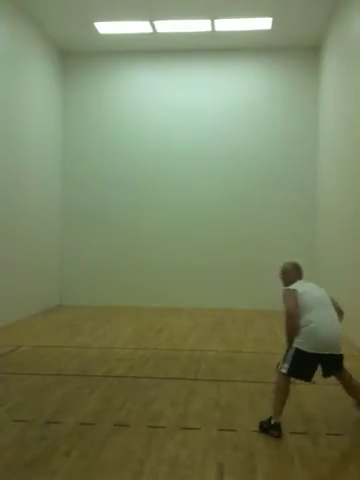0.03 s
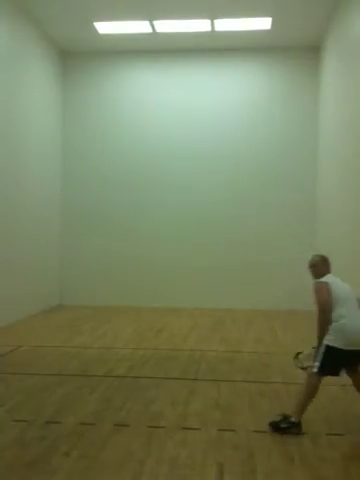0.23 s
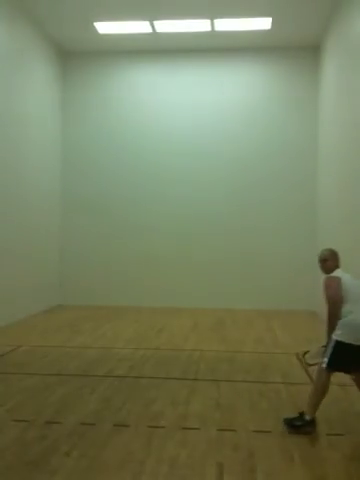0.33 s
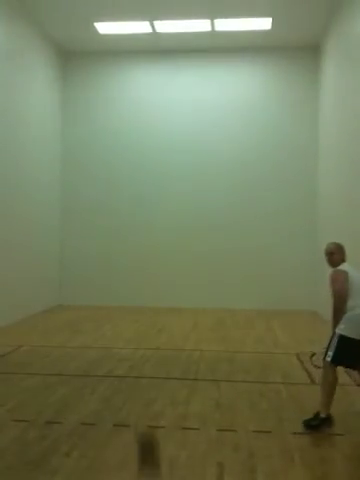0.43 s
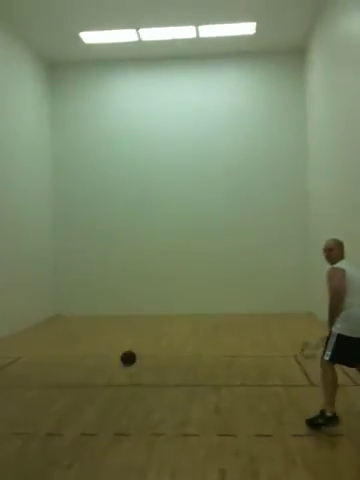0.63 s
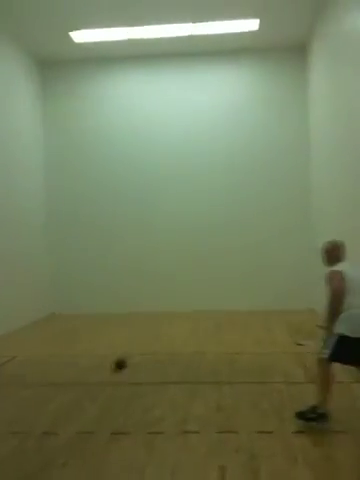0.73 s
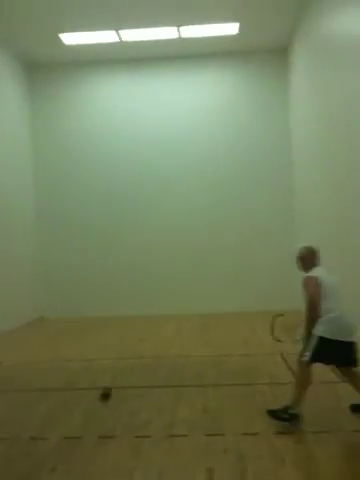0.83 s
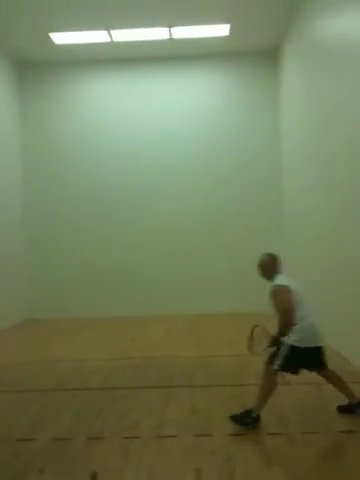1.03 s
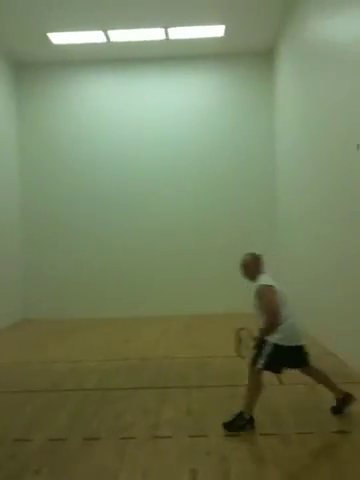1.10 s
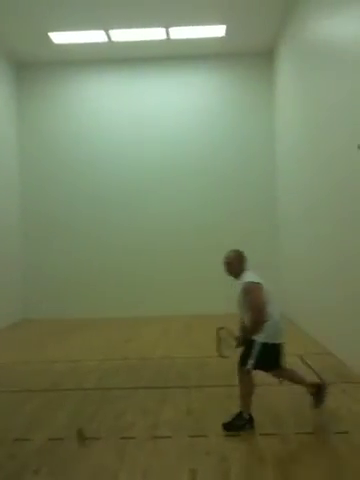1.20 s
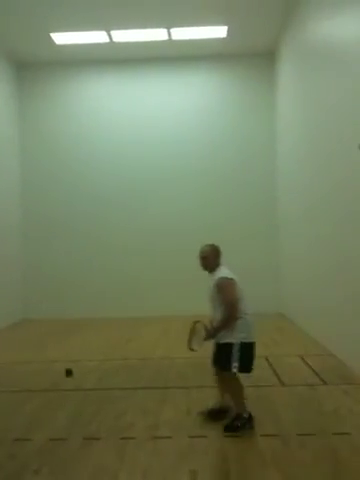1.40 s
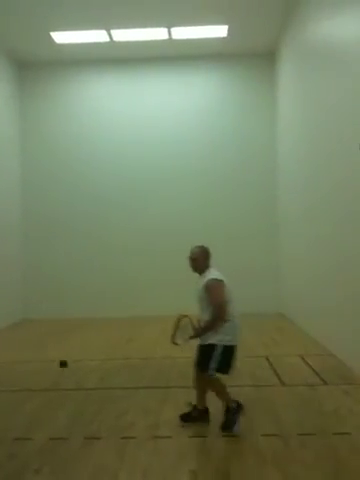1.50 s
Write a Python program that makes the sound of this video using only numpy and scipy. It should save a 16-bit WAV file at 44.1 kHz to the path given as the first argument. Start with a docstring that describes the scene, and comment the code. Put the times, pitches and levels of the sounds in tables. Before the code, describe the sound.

A racquetball skips off a wooden floor and slams into a wall close by, which booms and rattles in the echoing court. The jostled microphone rumbles, pops and briefly cuts out, then running steps thud and the ball bounces again.

```python
"""A racquetball court, close to the back wall, where an earlier shot still rings round the hall.
A hollow ball skips off the wooden floor and slams into the wall. The wall panel booms and its
loose metal fittings chatter. The jostled microphone rumbles, pops and cuts out briefly.
Dull thuds of running steps and bumps shake the camera, and the ball bounces once more."""
import sys
import numpy as np
from scipy import signal
from scipy.fft import rfft, irfft, next_fast_len
from scipy.io import wavfile
from scipy.ndimage import uniform_filter1d

SR = 44100
rng = np.random.default_rng(int(sys.argv[2]) if len(sys.argv) > 2 else 0)


def to_wav(s):
    """Save 16-bit WAV."""
    ch = np.atleast_2d(s).T  # columns
    pcm = np.round(np.clip(ch, -1, 1) * 32767)  # PCM
    wavfile.write(sys.argv[1], SR, pcm.astype(np.int16))


N = 68355


def undb(db):
    """Turn decibels (dB) into a number to multiply a sound by."""
    return 10 ** (np.asarray(db) / 20)


def since(start):
    """Seconds since a moment, zero before it."""
    return np.maximum(np.arange(N) / SR - start, 0)


def fade(start, t60, rise=0.003):
    """Swell quickly, then die away. The fade time, t60, is the seconds it takes to drop 60 dB."""
    age = since(start)
    return (1 - np.exp(-age / rise)) * np.exp(-np.log(1000) * age / t60)


def add(out, start, x):
    """Mix a short sound in at a moment."""
    i = int(np.clip(round(start * SR), 0, N - 1))
    out[i:i + len(x)] += x[:N - i]


def filtered(x, response):
    """Turn each frequency of a sound up or down, as the response function says."""
    size = next_fast_len(2 * N)
    f = np.fft.rfftfreq(size, 1 / SR) + 1e-6
    return irfft(rfft(x, size) * response(f), size)[:N]


def resonance(f, hz, q):
    """How a weight on a spring follows shaking at frequency f; a higher q rings longer."""
    return 1 / (1 + 1j * f / hz / q - (f / hz) ** 2)


def low_cut(x, hz):
    """Thin out the bass below hz."""
    return filtered(x, lambda f: -resonance(f, hz, q=0.79) * (f / hz) ** 2)


def colour(x, points):
    """Make a sound duller or brighter along a curve of (Hz, dB) points."""
    hz, db = np.array(points).T
    return filtered(x, lambda f: undb(np.interp(np.log(f), np.log(hz), db)))


def noise(points):
    """Noise of strength 1, coloured by (Hz, dB) points."""
    x = colour(rng.standard_normal(N), points)
    return x / x.std()


def ringing_noise(bands):
    """Noise of strength 1 that rings around a few pitches."""
    def response(f):
        return sum(undb(db) / (1 + 1j * (f / hz - hz / f) * hz / width) for hz, width, db in bands)
    x = filtered(rng.standard_normal(N), response)
    return x / x.std()


def ring(tones, start, rise):
    """The fading pure tones of something struck once."""
    return sum(undb(db) * fade(start, t60, rise) * np.sin(2 * np.pi * hz * since(start))
               for hz, db, t60 in tones)


def knock(contact_ms):
    """One push on the springy camera body, with a peak of 1; a longer contact is duller."""
    f = np.fft.rfftfreq(4096, 1 / SR)
    body = resonance(f, hz=164, q=1.35) * resonance(f, hz=184, q=0.56)
    bass_cut = resonance(f, hz=30, q=1) * f ** 4
    softness = (1 + 1j * np.pi * f * contact_ms / 1000) ** 4
    x = irfft(body * bass_cut / softness)
    return x / abs(x).max()


# The hall ringing from an earlier shot. Each row: pitch in Hz, width in Hz, relative level in dB.
EARLIER_RING = [(789, 32, 6.5), (974, 62, 4), (1725, 320, -14.5), (2400, 120, -10.5), (3040, 100, -14.5),
                (3840, 170, -9.5), (6500, 270, -23.5)]
# A fainter, later ring. Each row: pitch in Hz, width in Hz, relative level in dB.
LATER_RING = [(400, 49, 12), (630, 69, -2), (1560, 44, 0), (1780, 28, -1), (2410, 46, -3), (3730, 450, -10),
              (4900, 500, -26)]
# The steady hush of the air. Each row: frequency in Hz, relative level in dB.
AIR_COLOUR = [(25, -12), (70, -15), (135, 2), (300, -6), (500, -18.5), (800, -17), (1400, -28.5),
              (3000, -32), (7000, -36.5), (16000, -44)]

def hall():
    """Sound lingers between the walls as two fading rings, over steady air."""
    earlier = undb(-58) * ringing_noise(EARLIER_RING) * fade(0, t60=3.16)
    later = undb(-62) * ringing_noise(LATER_RING) * fade(0.876, t60=1.28, rise=0.01)
    return earlier + later + undb(-59.5) * noise(AIR_COLOUR)


# The rumble's deep tone. Each row: frequency in Hz, relative level in dB.
RUMBLE_COLOUR = [(25, -40), (70, -13.5), (125, 10), (200, 1), (320, -14), (600, -17), (1200, -48)]
# How the rumble rises and falls. Each row: time in seconds, level in dB.
RUMBLE_LEVELS = [(0, -53), (.17, -65.5), (.25, -43.5), (.5, -52), (.61, -40), (.73, -45), (.89, -48.5),
                 (.96, -53), (1.17, -59), (1.55, -47)]

def rumble():
    """A low rumble swells while the camera is disturbed."""
    times, db = np.array(RUMBLE_LEVELS).T
    return noise(RUMBLE_COLOUR) * undb(np.interp(since(0), times, db))


# Steps and bumps. Each row: start in seconds, level in dB, push (+1) or pull (-1),
# contact time in milliseconds.
STEPS_AND_BUMPS = [(0.0236, -41.5, -1, 1.68), (0.5303, -24.5, -1, 1.35), (0.7509, -23.5, 1, 0.39),
                   (0.7579, -20, 1, 0.27), (0.8207, -14, 1, 1.8), (1.0065, -34, 1, 0.21),
                   (1.0744, -28.5, -1, 0.24), (1.1222, -38.5, 1, 0.16), (1.1247, -34, 1, 1.9),
                   (1.2251, -34.5, -1, 0.89), (1.2421, -23, -1, 1.2), (1.3033, -35.5, 1, 2.7),
                   (1.3298, -48, 1, 0.17), (1.3314, -23.5, -1, 0.79), (1.3637, -31, 1, 0.71),
                   (1.3823, -34.5, 1, 0.41), (1.4342, -31.5, -1, 1), (1.5239, -28.5, -1, 0.84),
                   (1.5398, -30, -1, 0.73)]

def thuds():
    """Soft blows reach the camera body and make it thud."""
    out = np.zeros(N)
    for start, db, direction, contact_ms in STEPS_AND_BUMPS:
        add(out, start, direction * undb(db) * knock(contact_ms))
    return low_cut(out, hz=76)


# The ball's bounces. Each row: start in seconds, level in dB, slap in dB compared with that level.
FLOOR_HITS = [(.183, -33, -8.5), (1.197, -40.5, -40)]
# The hollow ball's tones. Each row: pitch in Hz, relative level in dB, fade time in seconds.
BALL_TONES = [(292, 6, 0.089), (340, -6, 0.2), (1010, -26.5, 0.032)]
# The hall's echo of a bounce. Each row: frequency in Hz, relative level in dB.
ECHO_COLOUR = [(60, -37), (130, -8.5), (200, 8), (290, 3), (450, -33), (950, -44), (2000, -59)]
# The ball's slap on the wood. Each row: frequency in Hz, relative level in dB.
SLAP_COLOUR = [(300, -8), (600, -1.5), (1000, 10.5), (1600, -21), (3000, -11), (4000, -15), (5500, -30),
               (7500, -16.5), (12000, -50)]

def floor_bounces():
    """The hollow ball slaps the floor and rings briefly, and the hall answers."""
    echo_noise, slap_noise = undb(-0.5) * noise(ECHO_COLOUR), noise(SLAP_COLOUR)
    out = np.zeros(N)
    for start, db, slap_db in FLOOR_HITS:
        ball = ring(BALL_TONES, start, rise=0.0037)
        echo = echo_noise * fade(start, t60=0.99, rise=0.011)
        slap = undb(slap_db) * slap_noise * fade(start, t60=0.086, rise=0.0012)
        out += undb(db) * (ball + echo + slap)
    return out


# The crack as the ball meets the wall. Each row: frequency in Hz, relative level in dB.
CRACK_COLOUR = [(300, -11), (900, 6), (1400, -0.5), (2000, -2.5), (2800, -9.5), (3700, -4), (5000, -8.5),
                (7500, -8.5), (9500, -27), (10500, -34), (16000, -46)]
# The wall panel's boom. Each row: pitch in Hz, relative level in dB, fade time in seconds.
PANEL_TONES = [(112.25, -7, 0.684), (176.3, 0.5, 0.56), (221.3, -4, 0.44), (262, -3.5, 0.58),
               (306.8, -8, .31), (141.8, -8, 0.45), (197, -16, 0.16), (404.4, -19, 0.43),
               (517, -13.5, 0.22), (153.7, 6.5, 0.057)]
# The panel's many other tones, blurred into noise. Each row: frequency in Hz, relative level in dB.
SHUDDER_COLOUR = [(50, -6), (100, 0), (200, 3), (350, -3), (520, -7.5), (800, -16), (1300, -28.5),
                  (1800, -34.5), (4000, -47)]
# The squashed ball's hollow pock. Each row: pitch in Hz, level in dB, fade time in seconds.
POCK_TONES = [(630, -29, 0.043), (765, -32, .06), (944, -34, 0.032), (1299, -34, 0.046),
              (3607, -38.5, 0.029)]

def back_wall():
    """The ball hits with a crack, a pock and a heavy push; the panel booms and shudders."""
    contact_s, panel_s, push_s = 0.2108, 0.2158, 0.2194
    crack = undb(-36.5) * noise(CRACK_COLOUR) * fade(contact_s, t60=0.067, rise=0.00081)
    boom = -undb(-17) * ring(PANEL_TONES, panel_s, rise=0.0021)
    shudder = undb(-23) * noise(SHUDDER_COLOUR) * fade(panel_s, t60=0.3, rise=0.00099)
    pock = ring(POCK_TONES, panel_s, rise=0.002)
    out = crack + boom + shudder + pock
    add(out, push_s, undb(-9.5) * knock(contact_ms=0.63))
    return low_cut(out, hz=87)


# The ticks of the metal fittings. Each row: start in seconds, relative level in dB.
TICKS = [(.2263, -24), (0.2327, -37), (0.2494, -29), (0.2532, -29), (0.2607, -34), (0.264, -36),
         (0.2704, -36), (0.2704, -35), (0.2774, -39.5), (0.2859, -35.5), (.298, -38.5), (.3058, -38),
         (0.308, -37.5), (0.3412, -43.5), (0.351, -46.5), (0.385, -52), (.4063, -53), (.4213, -56),
         (0.7611, -38), (1.3737, -49.5)]
# The ticks' bright tone. Each row: frequency in Hz, relative level in dB.
TICK_COLOUR = [(2000, -39), (4850, -12.5), (5400, -2), (7200, 0), (8200, -8), (10000, -17.5), (13000, -24),
               (16000, -34.5)]
# The fittings' brief scrape. Each row: frequency in Hz, relative level in dB.
SCRAPE_COLOUR = [(3000, -39), (6100, -14), (6900, 8), (8200, -21), (9800, -3), (11000, -27), (13300, -12),
                 (14500, -36)]

def fittings():
    """Loose metal ticks and scrapes against the shaking panel; each tick leaves a tiny sizzle."""
    taps, sizzle_level = np.zeros(N), np.zeros(N)
    for start, db in TICKS:
        add(taps, start, undb([db]))
        sizzle_level += undb(db - 36) * fade(start, t60=0.012, rise=0.00019)
    sizzle = rng.standard_normal(N) * sizzle_level
    scrape = undb(-39.5) * noise(SCRAPE_COLOUR) * fade(0.2385, t60=0.047, rise=0.00032)
    return undb(16) * colour(taps + sizzle, TICK_COLOUR) + scrape


# Two nearby knocks. Each row: start in seconds, level in dB.
CLACK_HITS = [(0.5263, -32.5), (1.0715, -38.5)]
# Their hollow ring. Each row: pitch in Hz, relative level in dB, fade time in seconds.
CLACK_TONES = [(297, 1.5, 0.029), (580, 4, 0.015), (973, -7, 0.016), (1530, -27, 0.013)]

def clacks():
    """Hollow knocks sound close by and die away almost at once."""
    return -sum(undb(db) * ring(CLACK_TONES, start, rise=0.00031) for start, db in CLACK_HITS)


# Jolts of the microphone. Each row: start in seconds, level in dB, push (+1) or pull (-1),
# snap in dB compared with that level.
JOLTS = [(0.6278, -32, -1, -45), (0.6368, -23, -1, -38), (.6437, -32, 1, -31), (.6716, -19, 1, -12),
         (0.6937, -32.5, -1, -22), (0.763, -16, -1, -33), (0.7652, -11, -1, -43.5), (0.7665, -11, 1, -43.5),
         (0.7743, -19, 1, -34.5), (0.778, -36, -1, -8), (0.7778, -22.5, -1, -43), (.794, -19.5, -1, -39),
         (0.8056, -24, -1, -46), (0.8081, -13.5, -1, -57), (.8089, -18.5, 1, -36), (0.817, -12.5, 1, -36.5),
         (0.8198, -23, -1, -36), (0.8239, -12, -1, -18), (0.8273, -10, -1, -41), (0.8283, -10, 1, -40),
         (.8337, -14.5, 1, -44), (.835, -12, -1, -42), (0.848, -18, -1, -39)]
# The bright snap on a pop. Each row: frequency in Hz, relative level in dB.
SNAP_COLOUR = [(1500, -7), (4000, -3), (9000, -4), (13000, -6.5), (16000, -10.5)]

def microphone_pops():
    """Sudden jolts make the microphone pop, dry and close, sometimes with a bright snap."""
    pops, snaps = np.zeros(N), np.zeros(N)
    pop = knock(contact_ms=0)
    for start, db, direction, snap_db in JOLTS:
        add(pops, start, direction * undb(db) * pop)
        add(snaps, start, -direction * undb([db + snap_db]))
    return pops + colour(snaps, SNAP_COLOUR)


# Gaps in the sound of the court. Each row: start in seconds, end in seconds.
GAPS = [(.628, .637), (.644, .672), (.68, .694)]

def microphone_cutouts():
    """A volume curve that drops by 30 dB while the microphone cuts out."""
    t = since(0)
    in_gap = np.any([(t > start) & (t < end) for start, end in GAPS], axis=0)
    volume = np.where(in_gap, undb(-30), 1.0)
    return uniform_filter1d(volume, size=64)  # soften the edges


def scene():
    """The court, broken by short gaps, with the close thuds, clacks and pops on top."""
    court = floor_bounces() + back_wall() + fittings() + hall() + rumble()
    return (court * microphone_cutouts() + thuds() + clacks() + microphone_pops())[None]


def record(dry):
    """Cut away the highest treble, above 16000 Hz."""
    treble_cut = signal.ellip(8, 0.2, 70, 16000, fs=SR, output="sos")
    return signal.sosfilt(treble_cut, dry)


dry = scene()
out = record(dry)
to_wav(out)
```